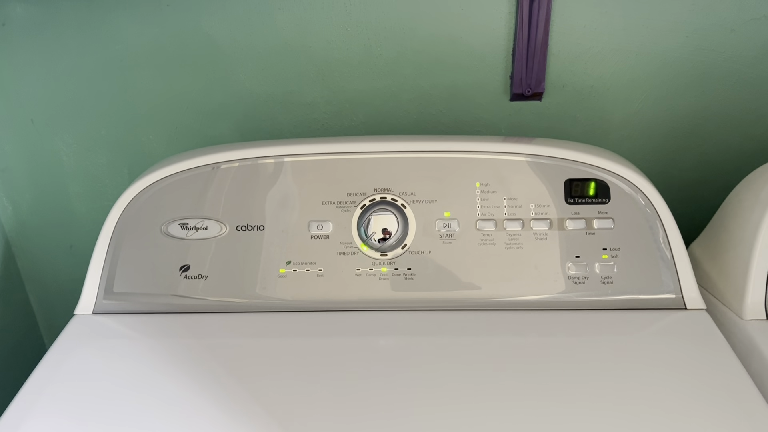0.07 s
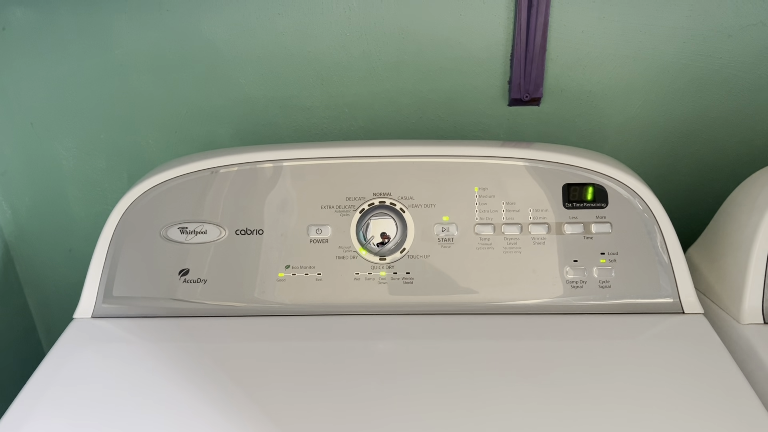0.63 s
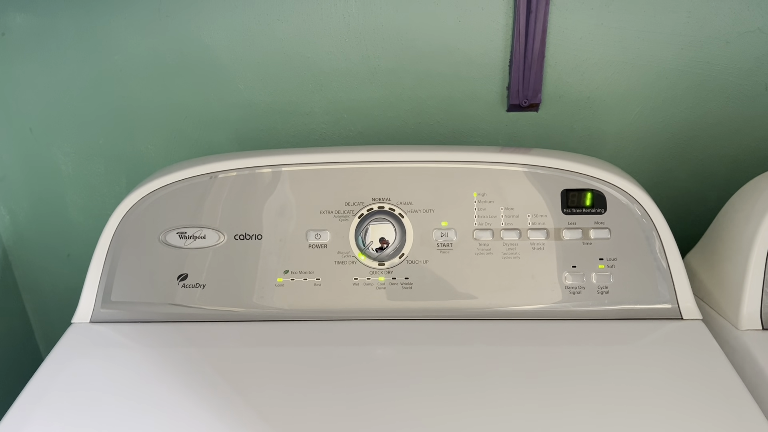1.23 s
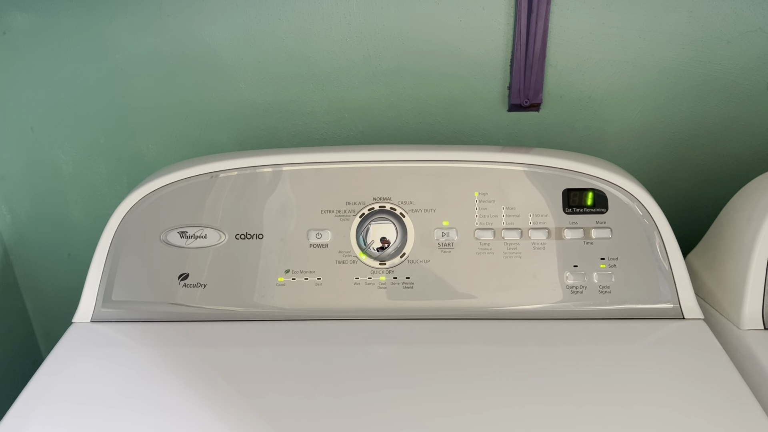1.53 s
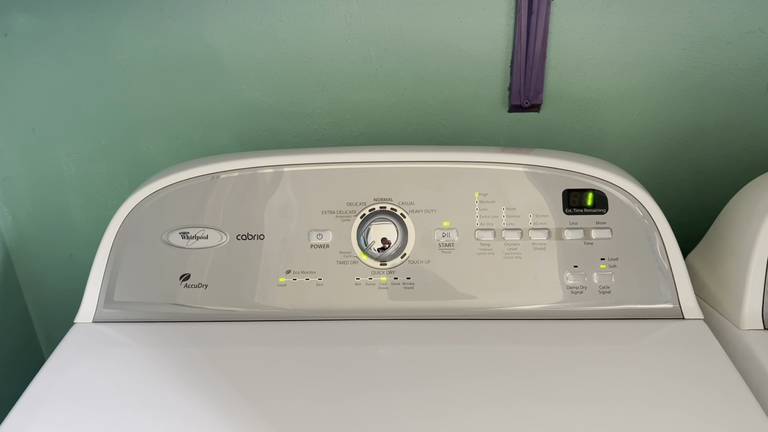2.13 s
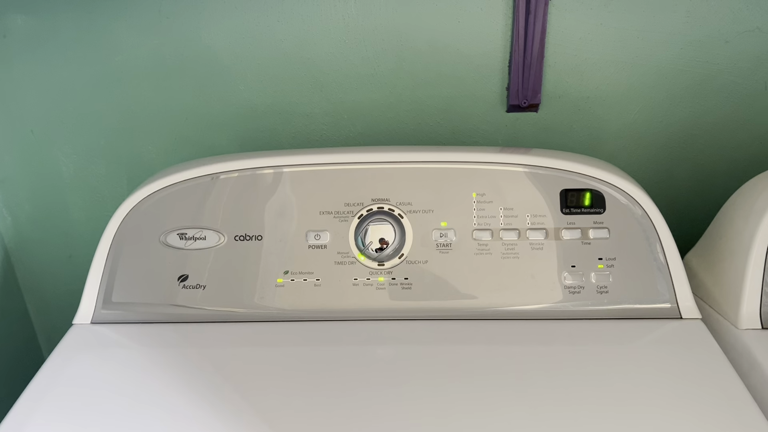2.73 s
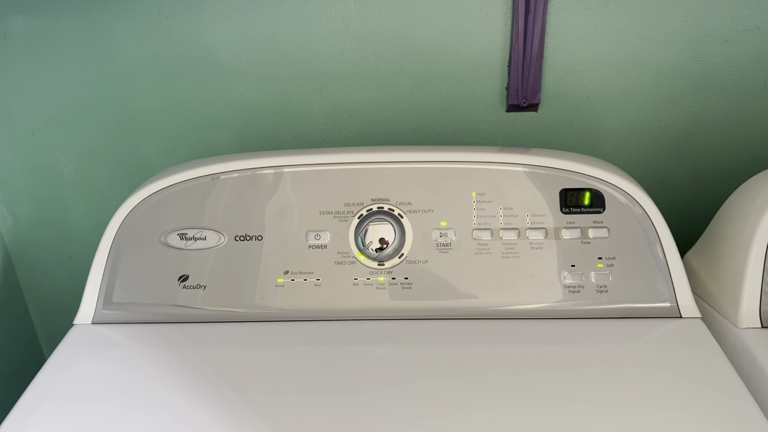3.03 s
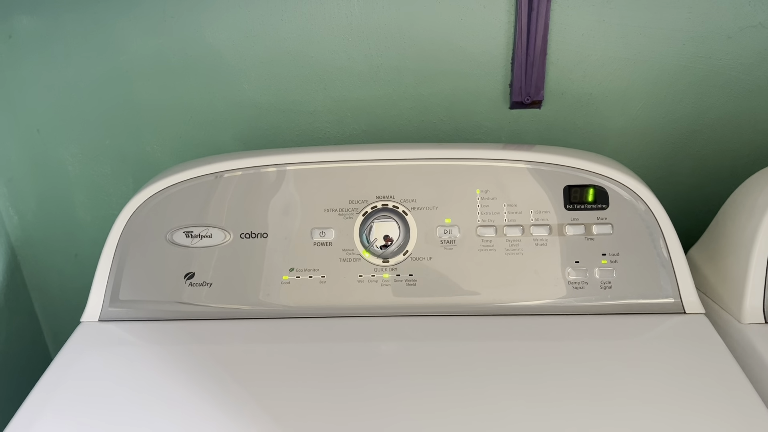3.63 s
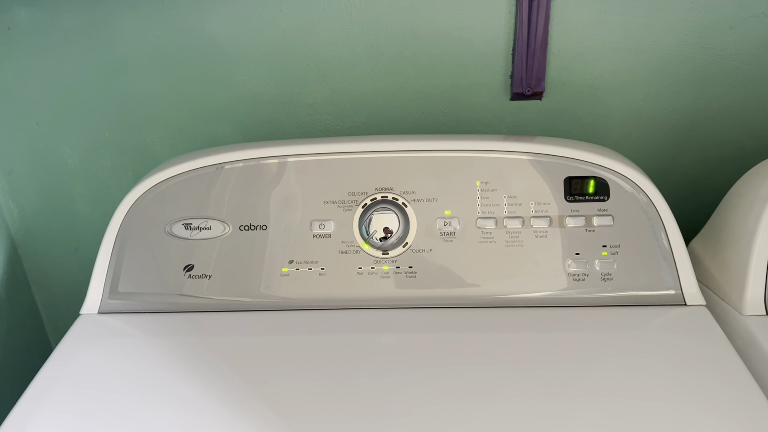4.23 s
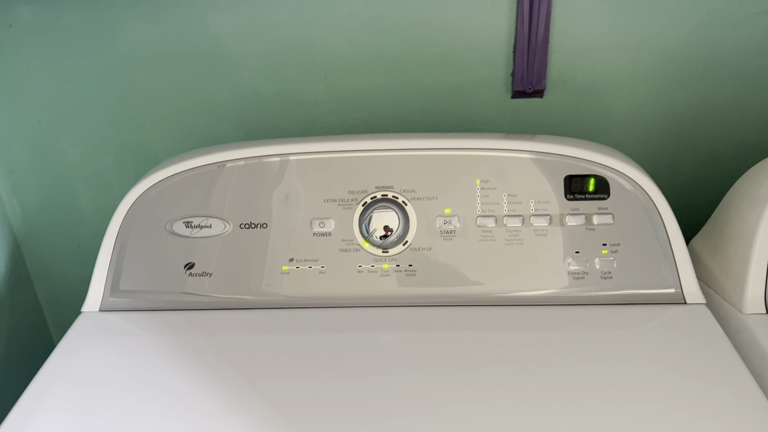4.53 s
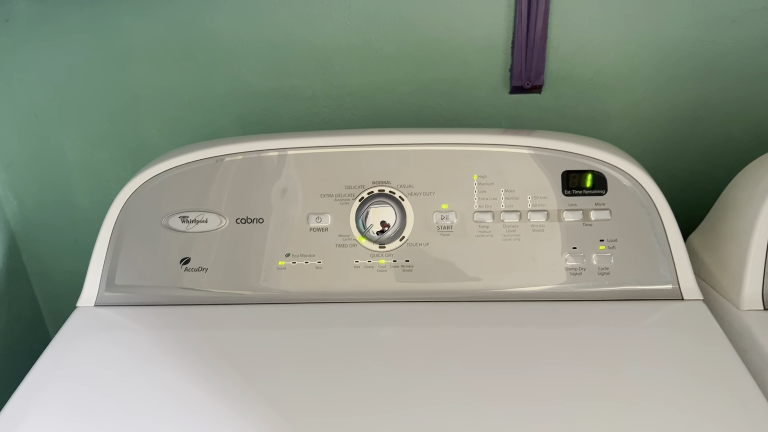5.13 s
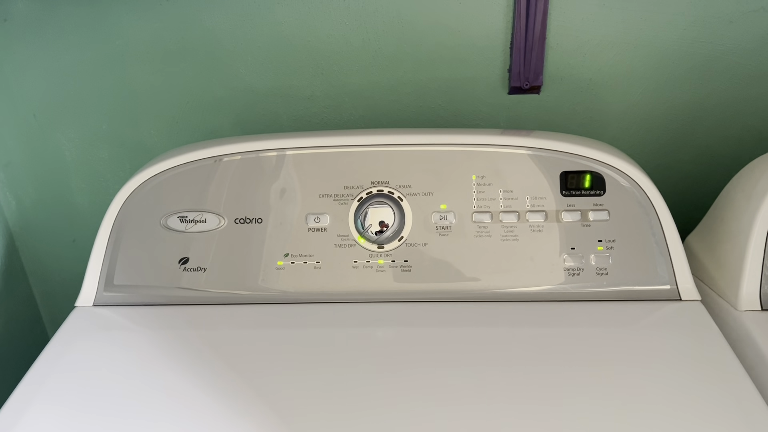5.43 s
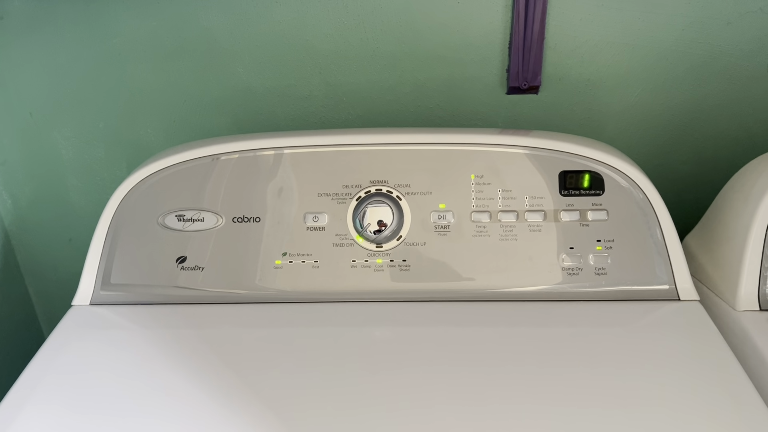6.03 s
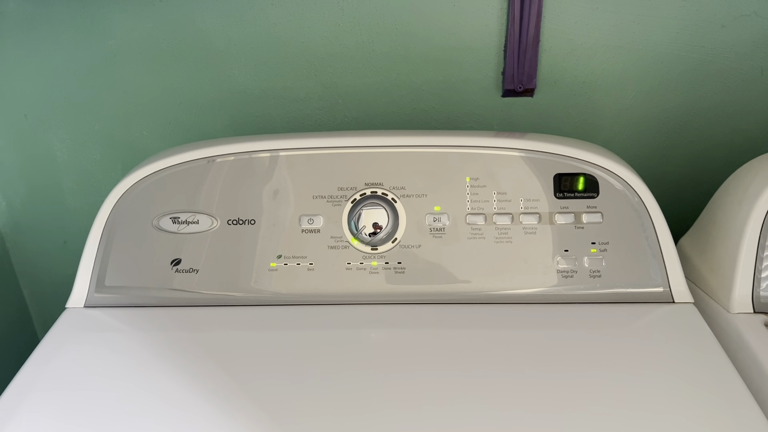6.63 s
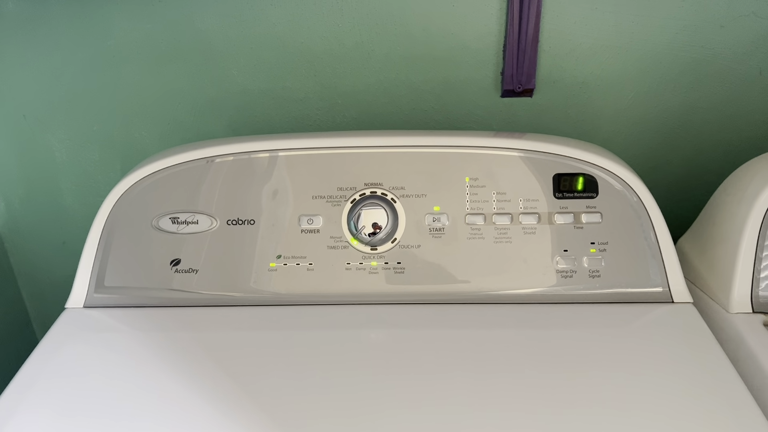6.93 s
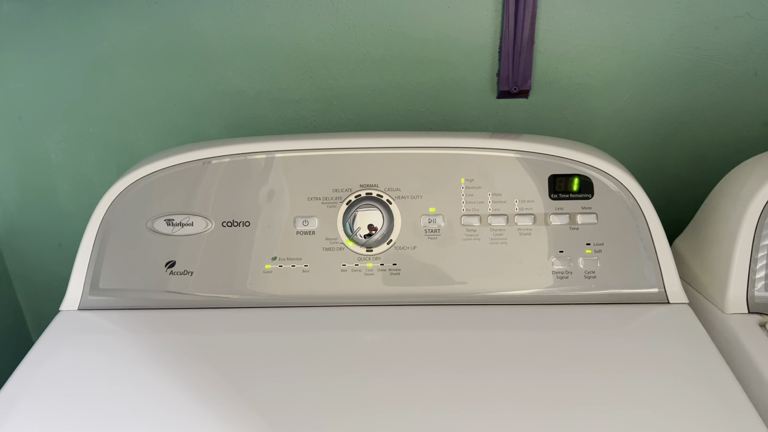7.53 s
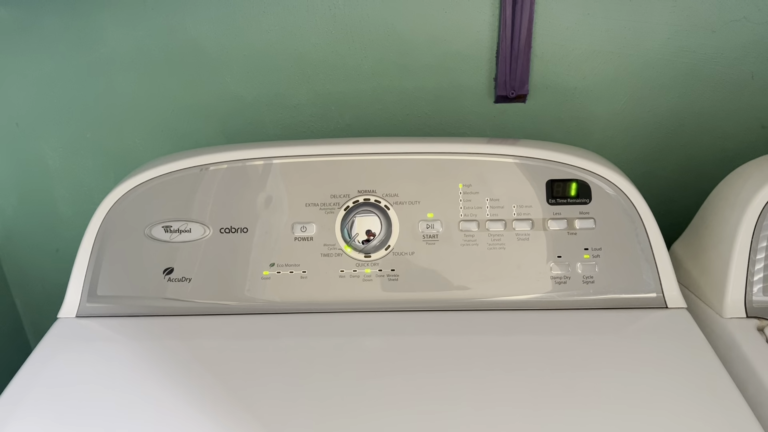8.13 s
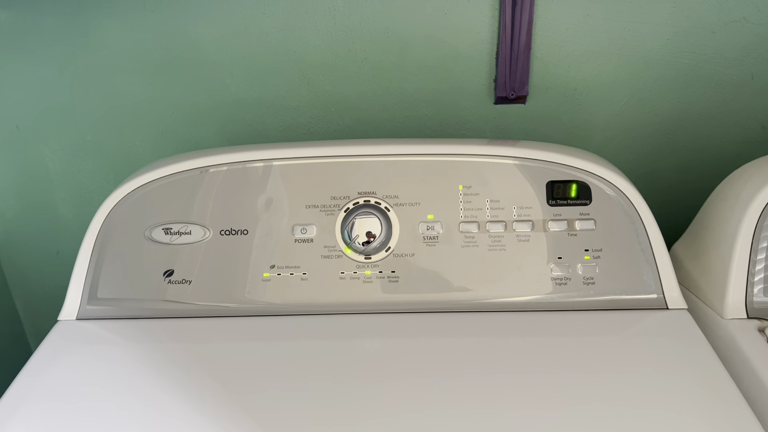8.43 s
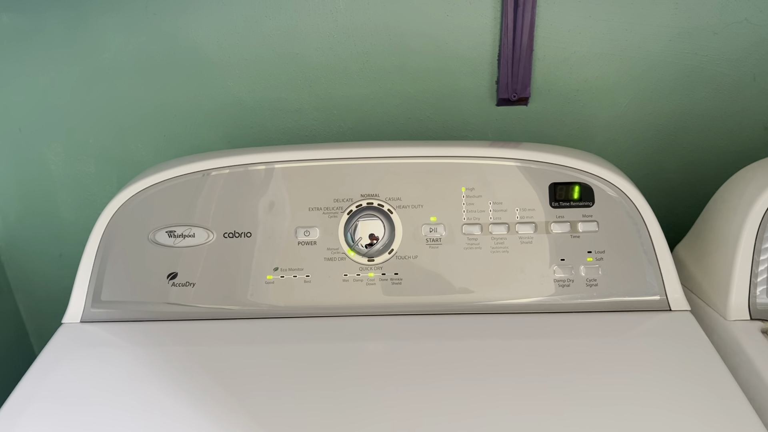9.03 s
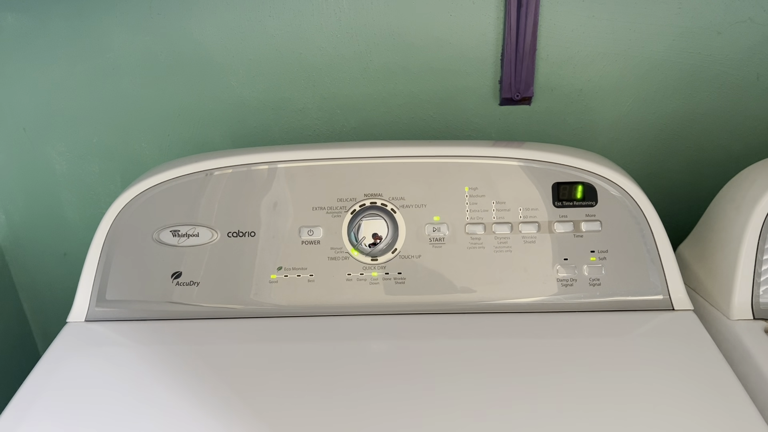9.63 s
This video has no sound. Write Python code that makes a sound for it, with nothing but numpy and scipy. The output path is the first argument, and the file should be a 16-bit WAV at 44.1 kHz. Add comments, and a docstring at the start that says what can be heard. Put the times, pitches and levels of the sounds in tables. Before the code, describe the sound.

Hard items clatter and knock in a turning steel dryer drum over a steady low motor hum and rushing air.

```python
"""Hard items drop, knock and skitter in the steel drum of a clothes dryer, heard from just above its lid
in a small room. Each blow makes the drum ring, and now and then a metal item rings on by itself.
Between falls the load settles and slides. The drum bumps over its rollers at the same spots every turn.
Under it all the motor hums at twice the mains frequency and the blower pushes air."""
import sys
import numpy as np
from scipy import signal
from scipy.fft import rfft, irfft, next_fast_len
from scipy.io import wavfile
from scipy.ndimage import map_coordinates

SR = 44100
rng = np.random.default_rng(int(sys.argv[2]) if len(sys.argv) > 2 else 0)


def persist_wave(psi):
    """Save psi, clipped to +-1, as 16-bit WAV."""
    counts = np.round(np.clip(psi, -1, 1) * 32767).astype(np.int16)
    wavfile.write(sys.argv[1], SR, np.atleast_2d(counts).T)


N = 431298


# Items hitting the drum: t/s, level/dB, hardness/dB (more clack), weight/dB (more thud)
BLOWS = [(0.7198, -29.5, -7.5, -6.5), (0.8644, -33, -11.5, -13), (0.9822, -41.5, -9.5, -2),
         (1.3342, -47.5, 2, -1), (1.5336, -18, -5.5, -6), (1.5674, -21.5, -0.5, -8),
         (1.6047, -14.5, -4, -5.5), (1.6742, -17.5, -2, -6), (1.7444, -18.5, -4, -12.5),
         (1.7723, -15, 1, -16.5), (2.6342, -21.5, -22, -9), (2.7446, -21.5, -9, -11),
         (2.8693, -15.5, -4, -8.5), (3.4214, -34.5, -18, -7), (3.6128, -15.5, -17.5, -15),
         (3.6734, -24, -15, -15), (3.7683, -22, -7.5, -14), (3.7992, -19, 2, -12), (4.1589, -41, -17, 1.5),
         (4.3446, -28, -18, -14.5), (4.6643, -10, -19.5, -16), (4.6971, -15, -13, -11.5),
         (4.7343, -15.5, -15, -14), (5.2894, -41, -16.5, -6), (5.5565, -21.5, -24.5, -9),
         (6.0544, -39.5, -29, -2), (6.4136, -13.5, -13.5, -15.5), (6.5744, -37, -10, -8),
         (7.2361, -22, -1, -11), (7.3226, -11, -4, -18.5), (8.1897, -9.5, -5.5, -13),
         (8.4094, -34.5, -9, -10), (8.4435, -31, -7, -10), (8.7106, -40, -11, -7), (9.044, -15, -7, -9),
         (9.1014, -15, -8, -19), (9.1814, -29, -4, -9), (9.2364, -29.5, -3.5, -11),
         (9.3077, -24.5, -18, -11)]

def blows(flight_s=.042, rebound_db=-16.5):
    """Each item lands, then rebounds once more weakly; dull items rebound most."""
    for s, db, hardness_db, weight_db in BLOWS:
        yield s, db, hardness_db, weight_db
        flight = flight_s * np.exp(.15 * rng.standard_normal())
        yield s + flight, db + rebound_db - .21 * hardness_db, hardness_db, weight_db


# The tone of a blow's low thud, hollow knock and hard clack: f/Hz, level/dB
THUD_TONE = [(150, -0.5), (300, -6.5), (500, -1), (660, -0.5), (740, -3.5), (950, 3.5), (1200, -9),
             (1800, -51.5)]
KNOCK_TONE = [(600, -35.5), (1050, -3), (1550, 0.5), (2100, 0), (2600, 2.5), (3050, -2.5), (5000, -39),
              (15000, -33)]
CLACK_TONE = [(1200, -62), (2400, -29.5), (3300, -4.5), (4200, 2), (5300, 0), (6000, -2), (8500, -4),
              (12000, -7), (15500, -8)]

def clatter(graze_db=-17, lead_s=.0015):
    """Blows ring the drum: hard items clack, dull ones knock, and an edge grazes just ahead."""
    t = np.arange(SR // 2) / SR
    track = np.zeros((2, N))
    for s, db, hardness_db, weight_db in blows():
        ring = steel_drum(t) + echo(t)
        hollow = brightened(KNOCK_TONE, hardness_db + 13)
        thud = amp(db + weight_db - 4) * strike(ring, THUD_TONE, .0021, chatter(.035, -8))
        knock = amp(db - 9.5) * strike(ring, hollow, .0029, chatter(.025, -7))
        clack = amp(db + hardness_db - 1.5) * strike(ring, CLACK_TONE, .0027, chatter(.02, -7.5))
        add(track, s - lead_s, thud + knock + clack)
        add(track, s - lead_s - .006, amp(graze_db) * (knock + clack / 2))
    return track


# The notes of the steel drum: f/Hz, level/dB, time to fade by 60 dB/s
DRUM_NOTES = [(510, 1.5, 0.39), (660.5, 5, 0.4), (823, 4, 0.22), (1228, 2, 0.51), (1430, -21.5, .27),
              (1720, -1, 0.35), (2134, -2.5, 0.074), (2520, -20.5, 0.23), (2680, -18, 0.26),
              (3260, -4, 0.23), (3682, -21.5, .2), (3970, -6.5, 0.15), (4260, -3.5, .27), (4630, -5, 0.39),
              (4800, -17, 0.2), (5150, -17, .25), (5930, -12, .2), (6700, 2.5, 0.24), (7456, -7.5, .18),
              (8100, -5, 0.2)]

def steel_drum(t, db=-24, scatter_db=3):
    """Each blow lands on a new spot, so the steel rings with a new mix of its notes."""
    hz, level_db, fade_s = np.transpose(DRUM_NOTES)[:, :, None]
    notes = amp(level_db - 60 * t / fade_s) * np.exp(2j * np.pi * hz * t)
    strengths = amp(db + rng.normal(0, scatter_db, len(hz)))
    phases = np.exp(2j * np.pi * rng.random((2, len(hz))))
    return spread(((strengths * phases) @ notes).real)


# How long the drum and room echo: f/Hz, time to fade by 60 dB/s
ECHO_FADE = [(200, 0.54), (700, 0.43), (2000, 0.33), (4000, 0.3), (8000, 0.23), (14000, 0.12)]

def echo(t):
    """The dense echo of one contact inside the drum; the highs die first."""
    noise = spread(rng.standard_normal((2, len(t))))
    hz, age, bands = signal.stft(noise, SR, nperseg=256)
    fade = amp(-60 * age / along(ECHO_FADE, hz)[:, None])
    return signal.istft(bands * fade, SR, nperseg=256)[1][:, :len(t)]


def strike(ring, tone, attack_s, bounces):
    """One part of a blow: the drum's ring, shaped by the contact and repeated by its bounces."""
    t = np.arange(ring.shape[1]) / SR
    sound = filtered(ring, lambda hz: amp(along(tone, hz))) * (1 - np.exp(-t / attack_s))
    sound = signal.fftconvolve(sound, bounces[None], axes=1)[:, :len(t)]
    return sound / np.std(sound[:, :SR // 30])  # the start has strength 1


def chatter(length_s, bounce_db, count=7):
    """One contact followed by weaker bounces at uneven moments."""
    when = rng.random(count)
    sizes = amp(bounce_db - 7 * when + rng.normal(0, 1.5, count)) * rng.choice([-1, 1], count)
    delays = (when * length_s * SR).astype(int)
    return np.bincount(np.r_[0, delays], np.r_[1, sizes])


def brightened(tone, hardness_db, slope=.48, pivot_hz=1700):
    """A harder contact is shorter, so it has more highs and fewer lows."""
    hz, db = np.transpose(tone)
    octaves = np.clip(np.log2(hz / pivot_hz), -1, 1)
    return np.c_[hz, db + slope * np.clip(hardness_db, -10, 10) * octaves]


# Items left ringing after a blow: t/s, f/Hz, level/dB, time to fade by 60 dB/s
ITEM_RINGS = [(1.676, 2205, -24.5, 0.34), (1.774, 2272, -36, 0.81), (3.612, 2520, -31, 0.42),
              (3.799, 3989, -17, 0.2), (7.318, 3989, -18.5, 0.18), (7.32, 4289, -17, 0.15),
              (9.103, 2520, -15, 0.12)]

def ringing_items(beat_hz=11, attack_s=.0029):
    """A metal item bounces clear and rings on; two close notes make it waver gently."""
    track, t = np.zeros((2, N)), np.arange(SR) / SR
    for s, hz, db, fade_s in ITEM_RINGS:
        note = np.sin(2 * np.pi * hz * t)
        partner = .3 * np.sin(2 * np.pi * ((hz + beat_hz) * t + rng.random((2, 1))))
        loudness = amp(db - 60 * t / fade_s) * (1 - np.exp(-t / attack_s))
        add(track, s, loudness * (note + partner))
    return track


def settling(db=-58, rest_db=-12, settle_s=.2, count=220):
    """Items keep nudging the drum wall softly; every blow stirs them up, then they calm down."""
    kicks = np.bincount([round(s * SR) for s, *_ in BLOWS],
                        [amp(.25 * blow_db) for _, blow_db, *_ in BLOWS], N)
    stirred = signal.lfilter([1], [1, -np.exp(-1 / (settle_s * SR))], kicks)
    movement = unit(amp(rest_db) + stirred)
    nudges = np.bincount(rng.integers(N, size=count), np.ones(count), N)
    touch = strike(echo(np.arange(SR // 2) / SR), KNOCK_TONE, .008, chatter(.044, -3.5))
    return amp(db) * movement * unit(signal.fftconvolve(nudges[None], touch, axes=1)[:, :N])


# The tone of the sliding swish, with the microphone's notch at 10 kHz: f/Hz, level/dB
SWISH_TONE = [(1500, -25), (4000, 4), (6500, 0), (8800, -1.5), (10000, -34), (11500, -3), (16000, -5.5)]
# How that swish rises and falls: t/s, level/dB
SWISH_LEVEL = [(0.06, -54), (0.25, -64.0), (0.56, -66.5), (1.27, -57.5), (2.1, -61), (2.48, -62.5),
               (3.12, -64.0), (3.3, -60.5), (5.02, -60.5), (5.2, -65), (5.44, -57.0), (5.8, -61.5),
               (6.3, -62.5), (6.72, -67), (7.1, -62.0), (7.95, -67), (8.06, -63.5), (9.6, -61.5)]

def sliding(db=-1, flutter_db=.8):
    """The load slides on the drum wall with a faint swish that swells and ebbs."""
    level_db = np.interp(np.arange(N) / SR, *np.transpose(SWISH_LEVEL))
    return amp(db + level_db + flutter_db * wobble(12)) * rush(SWISH_TONE)


# Bumps on the rollers: t/s into each turn, boom level/dB, rumble level/dB
ROLLER_BUMPS = [(0.056, -40, -40), (.72, -46, -37), (0.758, -34.5, -43.5), (.91, -36.5, -40),
                (.945, -53, -44.5), (0.982, -36, -40.5)]
# The deep notes of the cabinet panels: f/Hz, level/dB
PANEL_NOTES = [(56, -4.5), (66, -1)]
# The tone of the steady deep boom and of the rollers' rumble: f/Hz, level/dB
BOOM_TONE = [(15, -26), (30, -13), (42, 8.5), (55, 11), (65, 21.5), (80, 5.5), (105, 13.5), (150, -33)]
RUMBLE_TONE = [(80, -52), (135, 2), (165, 1.5), (210, -4), (330, -6), (400, -12), (600, -18.5), (1000, -40),
               (2500, -48)]

def rollers(turn_s=1.236, boom_db=-41, rumble_db=-42, boom_rise_s=.0415, rumble_rise_s=.032):
    """The drum rumbles on its rollers; each bump shakes the cabinet panels and swells the rumble."""
    t = np.arange(SR // 2) / SR
    swell = lambda rise: (t / rise * np.exp(1 - t / rise)) ** 2
    boom, surge = np.zeros((2, 1, N))
    for turn in np.arange(0, N / SR, turn_s):
        for s, bump_db, surge_db in ROLLER_BUMPS:
            panels = sum(amp(db + rng.normal(0, 2.4)) * np.sin(2 * np.pi * hz * (t - boom_rise_s))
                         for hz, db in PANEL_NOTES)
            add(boom, turn + s, amp(bump_db) * swell(boom_rise_s) * unit(panels))
            add(surge, turn + s, amp(surge_db + rng.normal(0, .47)) * swell(rumble_rise_s))
    rumble = np.hypot(amp(rumble_db + 1.9 * wobble(16)), surge) * rush(RUMBLE_TONE)
    return boom + amp(boom_db) * rush(BOOM_TONE) + rumble


# The humming notes of the motor and blower: f/Hz, level/dB
HUM_NOTES = [(117, -47.5), (120.04, -32), (240.08, -52.5), (333, -54)]

def motor(waver_db=.68):
    """The motor gives a magnetic hum, a little unsteady under the load."""
    t = np.arange(N) / SR
    hum = sum(amp(db) * np.sqrt(2) * np.sin(2 * np.pi * (hz * t + rng.random())) for hz, db in HUM_NOTES)
    return hum * amp(waver_db * wobble(6.4))


# The tone of the moving air: f/Hz, level/dB
AIR_TONE = [(100, -2.5), (500, 8), (1000, 0.5), (1500, -6), (2600, -11), (4000, -16.5), (6500, -31),
            (10000, -67), (16000, -61)]

def blower(db=-48):
    """The blower pushes air with a soft rush that flutters slightly."""
    return amp(db + .14 * wobble(3.3) + .87 * wobble(13)) * rush(AIR_TONE)


# How alike the two ears hear the sound: f/Hz, likeness (1 = the same)
EAR_LIKENESS = [(60, 0.78), (125, .97), (250, 0.8), (500, 0.55), (1000, 0.093), (2500, 0.33), (5000, 0.16),
                (7500, 0.56), (9500, 1)]

def spread(pair):
    """Blend two unrelated signals into the left and right of a sound that fills the room."""
    angle = lambda hz: np.arccos(np.clip(along(EAR_LIKENESS, hz), -1, 1)) / 2
    mid, side = filtered(pair, lambda hz: np.array([np.cos(angle(hz)), np.sin(angle(hz))]))
    return np.array([mid + side, mid - side])


def rush(tone):
    """Stereo noise with the given tone, at strength 1."""
    noise = rng.standard_normal((2, N))
    return unit(spread(filtered(noise, lambda hz: amp(along(tone, hz)))))


def amp(db):
    """Turn decibels into a number to multiply by."""
    return 10 ** (np.asarray(db) / 20)


def unit(x):
    """Scale to an average strength (rms) of 1."""
    return x / np.sqrt(np.mean(x ** 2) + 1e-20)


def along(points, hz):
    """Read between the rows of an (f/Hz, value) table, on a scale of octaves."""
    f, v = np.transpose(points)
    return np.interp(np.log(hz + 1), np.log(f + 1), v)


def wobble(rate):
    """A smooth curve through `rate` random points a second."""
    return map_coordinates(rng.standard_normal(int(N * rate / SR) + 4), [np.arange(N) * rate / SR])


def filtered(x, response):
    """Multiply each frequency in x by response(hz)."""
    n = x.shape[-1]
    padded = next_fast_len(n + 4096)
    return irfft(rfft(x, padded) * response(np.fft.rfftfreq(padded, 1 / SR)), padded)[..., :n]


def add(track, s, sound):
    """Mix a sound into the track at s seconds."""
    part = track[:, max(round(s * SR), 0):][:, :sound.shape[-1]]
    part += sound[..., :part.shape[-1]]


def scene():
    """The whole dryer, from the falling items to the air."""
    return clatter() + ringing_items() + settling() + sliding() + rollers() + motor() + blower()


# How much louder the left side is than the right: f/Hz, level/dB
LEFT_BOOST = [(30, 0), (60, 2.2), (1000, 2.1), (2200, 1.1), (4500, 2.8), (7500, 0)]

def record(dry, ceiling=.92, drift_hz=6700, lag_s=.000151, top_hz=15850):
    """The left is louder, the sides slip out of step in the highs; peaks are rounded, the top is cut."""
    sides = np.array([[1], [-1]])
    balance = lambda hz: amp(sides * along(LEFT_BOOST, hz) / 2)
    phase = lambda hz: sides * np.pi * lag_s * np.maximum(hz - drift_hz, 0)
    heard = filtered(dry, lambda hz: balance(hz) * np.exp(-1j * phase(hz)))
    rounded = heard / (1 + np.abs(heard / ceiling) ** 8) ** (1 / 8)
    return filtered(rounded, lambda hz: hz < top_hz)


dry = scene()
out = record(dry)
persist_wave(out)
```